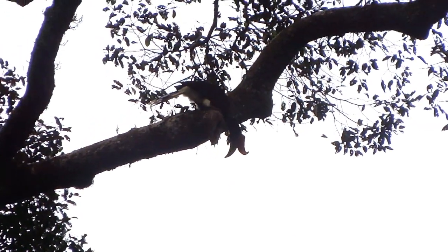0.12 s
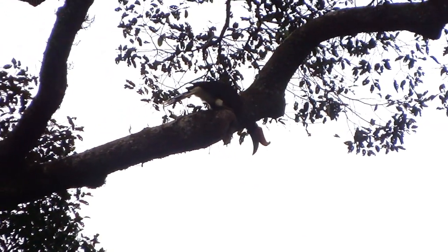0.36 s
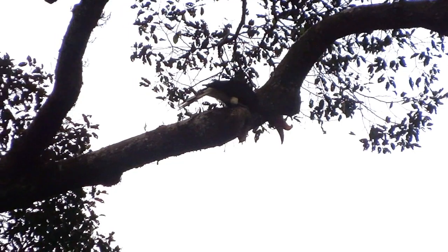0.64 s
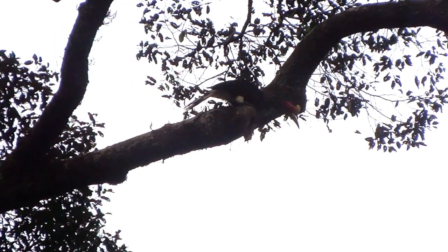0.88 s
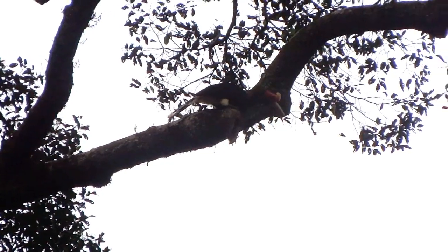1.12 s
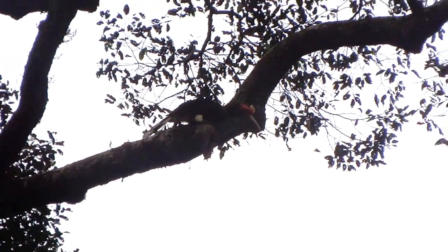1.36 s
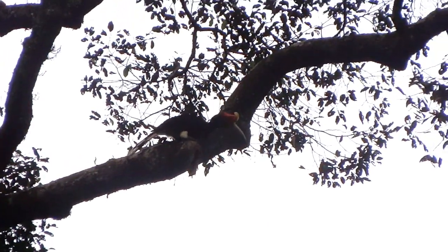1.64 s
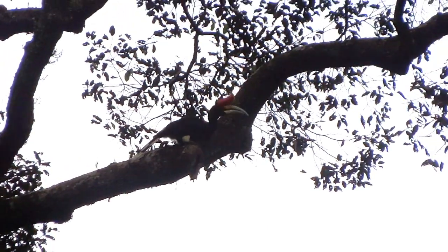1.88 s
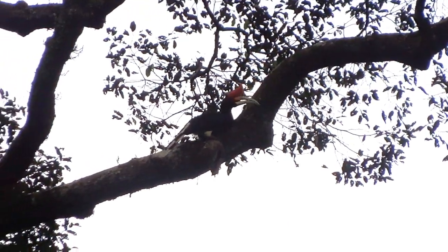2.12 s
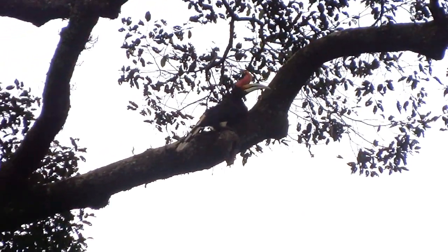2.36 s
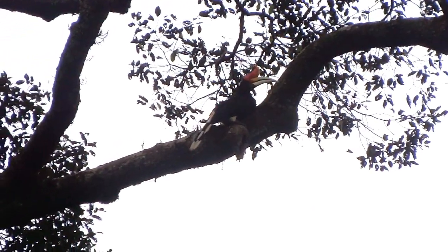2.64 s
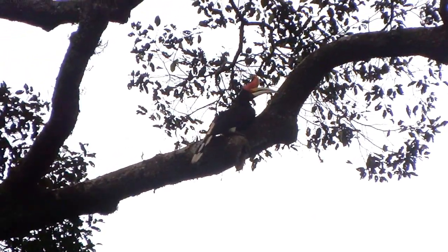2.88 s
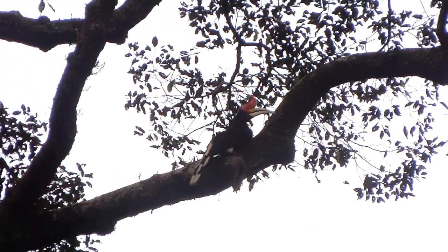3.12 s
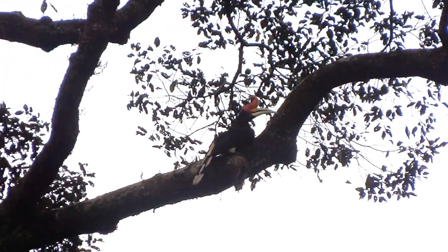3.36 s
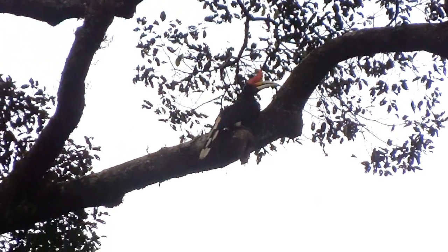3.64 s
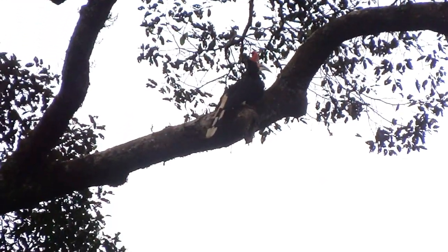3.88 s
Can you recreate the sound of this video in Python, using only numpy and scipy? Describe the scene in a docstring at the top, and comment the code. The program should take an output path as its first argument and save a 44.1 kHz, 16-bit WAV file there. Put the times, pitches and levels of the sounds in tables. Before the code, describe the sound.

A dense crowd of cicadas drones shrilly and evenly throughout, with one nearer buzzing steadily. Faint cricket pips and tiny early bird whistles sit within it, over distant river noise, in an open forest heard through a small stereo microphone.

```python
"""Daytime rain forest, under a tall tree: crowds of three kinds of cicada, each a sum of resonant click trains,
and one nearer cicada ticking so evenly that its overtones stand out.
Two crickets pip (pulsed sines), far birds whistle (gliding, warbling sines), leaves brush (noise bursts).
A river lies underneath (coloured noise); a small microphone pair listens."""
import sys
import numpy as np
from scipy import signal
from scipy.fft import rfft, irfft, next_fast_len
from scipy.io import wavfile
from scipy.ndimage import uniform_filter1d, map_coordinates

SR = 44100
rng = np.random.default_rng(int(sys.argv[2]) if len(sys.argv) > 2 else 0)


def boost_factor(decibels):
    """Convert a level in decibels to a linear amplitude factor."""
    exponent = np.asarray(decibels, float) / 20
    return 10 ** exponent


def to_wav(s):
    """Save 16-bit WAV."""
    ch = np.atleast_2d(s).T  # columns
    pcm = np.round(np.clip(ch, -1, 1) * 32767)  # PCM
    wavfile.write(sys.argv[1], SR, pcm.astype(np.int16))


N = 176400

# Tymbal and belly resonance of each crowd's kind: f/Hz, relative level/dB
SHRILL_RESONANCE = [(3880, -42), (6600, -19.5), (7450, -15), (8060, -5.5), (8610, 0.5), (10600, -6.5),
                    (11300, -5), (14700, -41), (22000, -120)]
MIDDLE_RESONANCE = [(2880, -26), (4900, -3.5), (5120, -9), (5730, 3.5), (6680, -3), (7200, -4.5),
                    (9360, -28), (15800, -120)]
LOW_RESONANCE = [(1530, -42), (2600, -21.5), (2800, -16.5), (3130, -13), (3680, 1.5), (4050, -3.5),
                 (4460, -1), (4650, -5.5), (4980, -16), (5300, -15.5), (6890, -43), (11700, -120)]
# Effort of the shrill and low crowds: t/s, shrill level/dB, low level/dB
SHRILL_LOW_EFFORT = [(0.0, -27.5, -41), (0.01, -29, -38), (1.56, -29, -38), (1.57, -29.5, -39),
                     (2.07, -29, -38.5), (2.72, -29, -39), (2.75, -28.5, -42.5), (2.86, -29.5, -37.5),
                     (2.93, -28.5, -39.5), (3.3, -29, -38.5), (3.69, -29, -39), (3.74, -29.5, -40),
                     (3.98, -29.5, -39), (4.0, -26, -37)]
# Soloist resonance: f/Hz, relative level/dB
SOLO_RESONANCE = [(7000, -62), (7400, -12), (7800, -10.5), (8300, -4), (8600, 4), (9400, -12), (9700, -11),
                  (10300, -11), (11000, -60)]
# Crickets: f/Hz, level before swell/dB, pip rate/Hz, centre of one pip t/s, swell peak t/s, swell 1/e half-width/s
CRICKET_CALLS = [(3768, -50, 7.9, 1.9, 2.0, .8), (10896, -45, 7.9, 1.88, 2.3, 1.2)]
# Bird notes: start t/s, length/s, mid-note f/Hz, glide over the note/Hz, direct level/dB
BIRD_NOTES = [(.25, .04, 2000, -6.5, -63), (.31, .05, 1950, -19.5, -56.5), (.37, .04, 2720, -2, -60),
              (.54, .12, 5000, 63, -54), (.6, .07, 4300, 5, -52), (.65, .04, 2880, 3, -57),
              (.86, .08, 5050, -120, -45), (1.58, .04, 2800, -6, -61), (2.85, .05, 2880, -2, -63)]
# Leaf brushes: centre t/s, 1/e half-width/s, peak level/dB
LEAF_BRUSHES = [(.42, .04, -48.5), (3.03, .04, -50)]
# Leaf noise colour: f/Hz, relative level/dB
LEAF_COLOUR = [(900, -40), (1400, 1), (2500, -3), (3300, -6), (4500, -40)]
# River noise colour: f/Hz, relative level/dB
RIVER_COLOUR = [(12, -55), (20, -28.5), (124, -7), (147, -4.5), (182, -8), (216, -1.5), (256, -3.5),
                (337, -1), (463, -3), (724, -4), (2010, -16), (3200, -12.5), (4160, -33), (7040, -120)]
# Left-right likeness of spread sources: f/Hz, correlation
LIKENESS = [(60, 0.86), (110, 0.87), (190, 0.88), (350, 0.9), (620, 0.87), (1110, 0.8), (1990, 0.83),
            (3560, 0.88), (6380, 0.91), (11400, 0.92)]
# Microphone colour difference: f/Hz, left minus right level/dB
PORT_TILT = [(60, 0), (110, -0.5), (190, -0.5), (350, 0.0), (620, -1.0), (1110, -0.5), (1990, -0.5),
             (3560, 0.5), (6380, -0.5), (11400, -3)]
# Microphone phase difference: f/Hz, left lead/rad
PORT_LEAD = [(100, 0), (5000, -.05), (11000, -.2)]

MIDDLE_DB, SOLO_DB, RIVER_DB = -45, -39, -42.5
SOLO_CLICK_HZ, SOLO_RATE_DRIFT = 268.9, .0015  # drift: relative
PIP_HALF_WIDTH_S = .018  # to 1/e
WARBLE_AT_5KHZ_HZ, NOTE_EDGE_S = 60, .012
BAND_LIMIT_HZ = 11020


def unit(x):
    """Scale to rms 1."""
    return x / np.sqrt(np.mean(x ** 2) + 1e-20)


def along(points, hz):
    """Interpolate (f/Hz, value) points on a log frequency axis."""
    f, value = np.transpose(points)
    return np.interp(np.log(hz + 1), np.log(f + 1), value)


def wobble(knots_hz):
    """Smooth random curve through normal knots."""
    knots = rng.standard_normal(int(N * knots_hz / SR) + 4)
    return map_coordinates(knots, [np.arange(N) * knots_hz / SR])


def filtered(x, response):
    """Multiply the spectrum of x by a response of frequency."""
    m = next_fast_len(N + 8192)
    return irfft(rfft(x, m) * response(np.fft.rfftfreq(m, 1 / SR)), m)[..., :N]


def trunks(x, t60_s, wet_db):
    """Direct sound plus a decaying noise tail: scatter among trunks and leaves."""
    t = np.arange(SR // 2) / SR
    tail = rng.standard_normal(len(t)) * boost_factor(-60 * t / t60_s)
    tail /= np.linalg.norm(tail)
    return x + boost_factor(wet_db) * signal.fftconvolve(x, tail)[:len(x)]


def spread(pair, colour):
    """Colour two unrelated signals and mix them as mid and side to the wanted left-right likeness, rms 1."""
    def response(hz):
        angle = np.arccos(np.clip(along(LIKENESS, hz), -1, 1)) / 2
        return boost_factor(along(colour, hz)) * [np.cos(angle), np.sin(angle)]

    mid, side = filtered(pair, response)
    return unit(np.array([mid + side, mid - side]))


def clicks(rate_hz, drift, jitter_periods, size_db):
    """Tymbal clicks at a wandering rate, uneven in time and size, from 0.5 s before the scene."""
    n = N + SR // 2
    rate = rate_hz * (1 + drift * np.pad(wobble(9), (SR // 2, 0), "reflect"))
    # one click per whole cycle of the integrated rate
    at = np.interp(np.arange(1, int(rate.sum() / SR)), np.cumsum(rate) / SR, np.arange(n))
    luck = rng.standard_normal((len(at), 2))
    at = np.clip(at + jitter_periods * luck[:, 0] * SR / rate_hz, 8, n - 10)
    # windowed sinc places each click between samples
    taps = np.floor(at)[:, None] + np.arange(-7, 9)
    offset = taps - at[:, None]
    pulse = np.sinc(offset) * np.cos(np.pi * offset / 17) ** 2
    pulse = boost_factor(size_db * luck[:, 1:]) * pulse
    return np.bincount(taps.astype(int).ravel(), pulse.ravel(), n)


def crowd(colour, rate_hz, swell_db, count):
    """Cicadas of one kind, each at its own rate, swelling on its own, deep in scatter."""
    def group():
        total = np.zeros(N)
        for _ in range(count):
            own_rate_hz = rate_hz * np.exp(.15 * rng.standard_normal())
            train = clicks(own_rate_hz, .01, jitter_periods=.08, size_db=3.0)
            total += trunks(train, t60_s=.35, wet_db=9.5)[-N:] * boost_factor(swell_db * wobble(4))
        return unit(total)

    return spread(np.array([group(), group()]), colour)


def soloist():
    """Nearer cicada: near-periodic clicks through its resonance give distinct overtones."""
    train = clicks(SOLO_CLICK_HZ, SOLO_RATE_DRIFT, jitter_periods=.004, size_db=.2)
    ticking = trunks(train, t60_s=.25, wet_db=2)[-N:]
    voice = unit(filtered(ticking, lambda hz: boost_factor(along(SOLO_RESONANCE, hz))))
    return voice * boost_factor(SOLO_DB + 2.2 * wobble(3))


def cicadas():
    """Shrill and low crowds following their effort curves, a middle crowd at a steady level, plus the soloist."""
    effort_s, shrill_db, low_db = np.transpose(SHRILL_LOW_EFFORT)
    t = np.arange(N) / SR
    shrill_gain = boost_factor(np.interp(t, effort_s, shrill_db))
    low_gain = boost_factor(np.interp(t, effort_s, low_db))
    shrill = shrill_gain * crowd(SHRILL_RESONANCE, 210, swell_db=1.5, count=6)
    middle = boost_factor(MIDDLE_DB) * crowd(MIDDLE_RESONANCE, 170, swell_db=2.5, count=4)
    low = low_gain * crowd(LOW_RESONANCE, 150, swell_db=2.0, count=5)
    return shrill + soloist() + middle + low


def crickets():
    """Gaussian-gated sine pips in a steady beat that swells and fades."""
    t, out = np.arange(N) / SR, np.zeros(N)
    for hz, db, rate_hz, pip_s, peak_s, swell_s in CRICKET_CALLS:
        beat = ((t - pip_s) * rate_hz + .5) % 1 - .5  # periods from nearest pip
        pips = np.exp(-(beat / rate_hz / PIP_HALF_WIDTH_S) ** 2)
        swell = .35 + np.exp(-((t - peak_s) / swell_s) ** 2)
        phase = 2 * np.pi * np.cumsum(hz + 12 * wobble(30)) / SR
        out += boost_factor(db + 2.5 * wobble(8)) * pips * swell * np.sin(phase)
    return trunks(out, t60_s=.3, wet_db=-3)


def birds():
    """Thin whistles: sines with glide and random warble, blurred by distance."""
    t, out = np.arange(N) / SR, np.zeros(N)
    for start_s, length_s, hz, glide_hz, db in BIRD_NOTES:
        shape = np.clip(np.minimum(t - start_s, start_s + length_s - t) / NOTE_EDGE_S, 0, 1)
        glide = glide_hz * np.clip((t - start_s) / length_s - .5, -1, 1)
        warble = WARBLE_AT_5KHZ_HZ * hz / 5000 * wobble(60)
        phase = 2 * np.pi * np.cumsum(hz + glide + warble) / SR
        out += boost_factor(db) * np.sqrt(2) * shape * np.sin(phase)
    return trunks(out, t60_s=.3, wet_db=2)


def leaves():
    """Brushed foliage: brief bursts of coloured noise with a fast uneven level."""
    t, shape = np.arange(N) / SR, np.zeros(N)
    for centre_s, width_s, db in LEAF_BRUSHES:
        shape += boost_factor(db) * np.exp(-((t - centre_s) / width_s) ** 2)
    noise = rng.standard_normal((2, N)) * boost_factor(4 * wobble(120))
    return shape * spread(noise, LEAF_COLOUR)


def river():
    """Far water: smooth noise, its level shallowly patchy over time and frequency."""
    bins = signal.stft(rng.standard_normal((2, N)), nperseg=512)[2]
    patches = uniform_filter1d(rng.standard_normal(bins.shape[1:]), size=5, axis=0)
    patches = unit(uniform_filter1d(patches, size=16, axis=1))
    pair = signal.istft(bins * boost_factor(.8 * patches), nperseg=512)[1][:, :N]
    return boost_factor(RIVER_DB + .4 * wobble(1.5)) * spread(pair, RIVER_COLOUR)


def scene():
    """Sum of all sources, left and right."""
    return cicadas() + crickets() + birds() + leaves() + river()


def roll_off(x):
    """The treble ends steeply here."""
    return signal.sosfilt(signal.butter(12, 12030, fs=SR, output="sos"), x)


def record(dry):
    """Two microphone ports differing a little in colour and timing, band-limited."""
    side = np.array([[.5], [-.5]])  # half the difference to each port

    def ports(hz):
        colour = boost_factor(side * along(PORT_TILT, hz))
        timing = np.exp(1j * side * along(PORT_LEAD, hz))
        return colour * timing * (hz < BAND_LIMIT_HZ)

    return roll_off(filtered(dry, ports))


dry = scene()
out = record(dry)
to_wav(out)
```